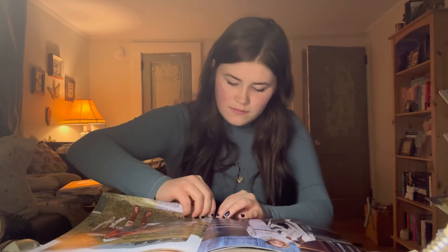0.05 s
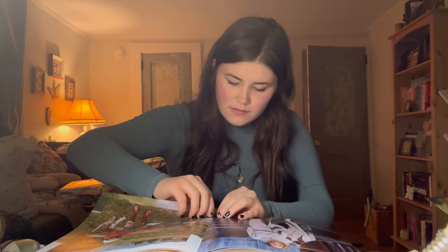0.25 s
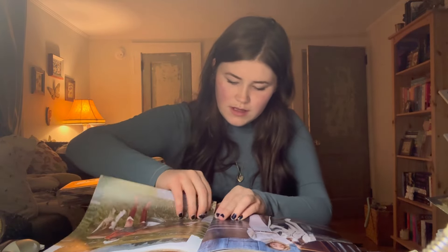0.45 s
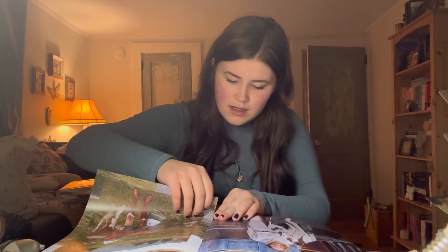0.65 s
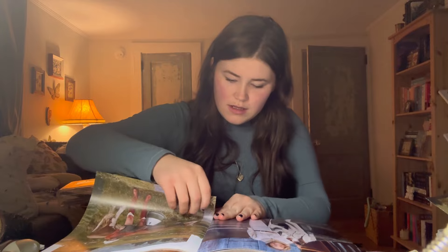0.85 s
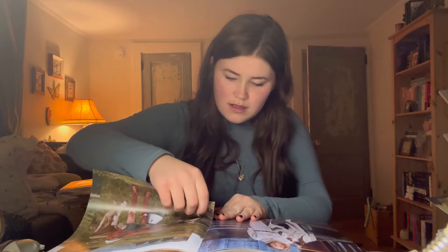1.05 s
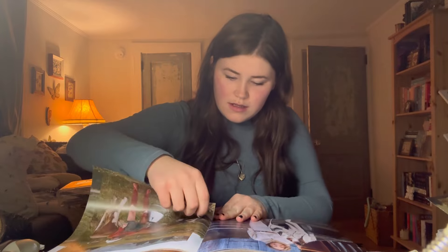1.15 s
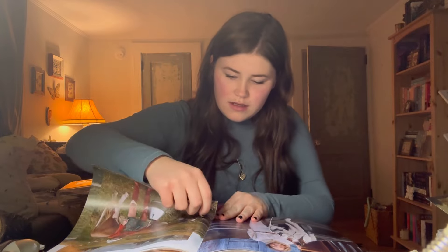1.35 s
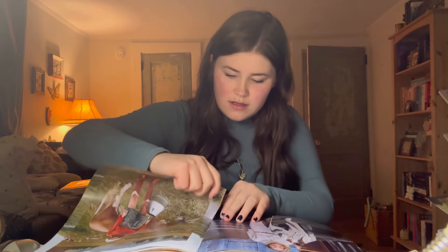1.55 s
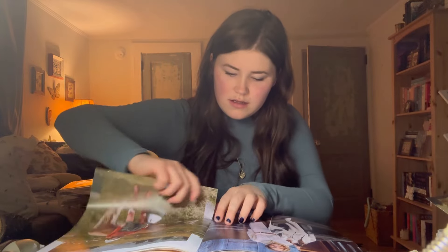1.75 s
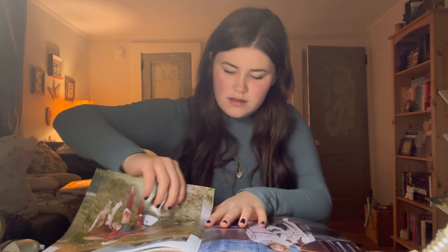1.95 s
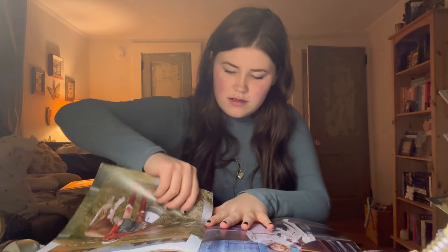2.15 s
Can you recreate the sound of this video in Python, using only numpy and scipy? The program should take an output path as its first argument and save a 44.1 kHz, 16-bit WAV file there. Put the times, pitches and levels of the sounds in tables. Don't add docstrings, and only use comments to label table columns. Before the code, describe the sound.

A glossy magazine page is ripped out by hand, close to a stereo microphone in a small furnished room: a few small snaps, a dense bright rip, then softer rustles and crinkles of the loose sheet.

```python
import sys
import numpy as np
from scipy import signal
from scipy.fft import rfft, irfft, next_fast_len
from scipy.io import wavfile
from scipy.ndimage import uniform_filter1d, minimum_filter1d, map_coordinates

SR = 44100
rng = np.random.default_rng(int(sys.argv[2]) if len(sys.argv) > 2 else 0)


def ratio_of_db(decibels):
    return 10 ** (np.asarray(decibels, float) / 20)


def master(y):
    cut = np.clip(np.atleast_2d(y).T, -1, 1)
    pcm = np.round(cut * 32767)
    wavfile.write(sys.argv[1], SR, pcm.astype(np.int16))


N = 97020


def unit(x):
    return x / np.sqrt(np.mean(x ** 2) + 1e-20)


def along(points, hz):
    f, value = np.transpose(points)
    return np.interp(np.log(hz + 1), np.log(f + 1), value)


def curve(rows, column=1):
    rows = np.transpose(rows)
    return np.interp(np.arange(N) / SR, rows[0], rows[column], right=-120)


def wobble(rate):
    knots = rng.standard_normal(2000)
    return map_coordinates(knots, [np.arange(N) * min(rate, 800) / SR])


def filtered(x, response):
    m = next_fast_len(N + 8192)
    hz = np.fft.rfftfreq(m, 1 / SR)
    return irfft(rfft(x, m) * response(hz), m)[..., :N]


def causal(spectrum):
    def response(hz):
        gain = np.maximum(ratio_of_db(along(spectrum, hz)), 1e-4)
        cepstrum = irfft(np.log(gain))
        half = len(cepstrum) // 2
        cepstrum[1:half] *= 2
        cepstrum[half + 1:] = 0
        return np.exp(rfft(cepstrum))
    return response


def place(s, shapes):
    at = np.round(s * SR).astype(int)[:, None] + np.arange(shapes.shape[1])
    return np.bincount(at.ravel(), shapes.ravel(), N + SR)[:N]


def grains(s, hz, cycles, size, glide=0, rise=0.17, length=700):
    turns = hz[:, None] * np.arange(length) / SR
    phase = turns + glide * (1 - np.exp(-turns))
    envelope = np.exp(-turns / cycles) * (1 - np.exp(-turns / rise))
    return place(s, size[:, None] * np.sin(2 * np.pi * phase) * envelope)


def crackle(spectrum, spiky_db, clump_db, clump_rate, centre, spread, cycles, ring_db, hiss_db, count):
    u, g = rng.random((count, 3)), rng.standard_normal((count, 2))
    s = u[:, 0] * (N - 1) / SR
    density = wobble(clump_rate) + 0.58 * wobble(clump_rate / 4)
    clump = ratio_of_db(clump_db * np.clip(density, -3, 1.5))
    spike_db = np.minimum(-spiky_db * np.log(u[:, 1]), 14)
    size = ratio_of_db(spike_db) * clump[(s * SR).astype(int)]
    clicks = place(s + 0.00018, (size * g[:, 1])[:, None])
    bare = clicks + ratio_of_db(hiss_db) * clump * rng.standard_normal(N)
    hz = np.interp(s, *np.transpose(centre)) * np.exp(spread * g[:, 0])
    ring = grains(s[::4], np.clip(hz[::4], 150, 9000), cycles, size[::4])
    return unit(unit(filtered(bare, causal(spectrum))) + ratio_of_db(ring_db) * unit(ring))


def snaps(rows, ring_db, crack_db, burst_s, cycles, count, lag_s=.0006):
    s, db, hz, rel_db = np.transpose(rows)
    u, g = rng.random((len(s), count)), rng.standard_normal((len(s), count))
    s = s + lag_s
    late = -burst_s * np.log(u) * (np.arange(count) > 0)
    follower = late > 0
    size = ratio_of_db(db[:, None] + ring_db - 4 * late / burst_s - 8.5 * follower) * np.sign(g)
    patch_hz = hz[:, None] * np.exp((0.2 + 0.28 * g) * follower)
    start = s[:, None] + late
    ring = grains(start.ravel(), patch_hz.ravel(), cycles, size.ravel(), glide=0.043, rise=0.37)

    t = np.arange(1300) / SR
    decay = np.exp(-t / 0.0017) + 0.22 * np.exp(-t / 0.016)
    shape = decay * (1 - np.exp(-t / 0.00029))
    noise = rng.standard_normal((len(s), len(t)))
    rough = uniform_filter1d(rng.standard_normal((len(s), len(t))), size=40) * np.sqrt(40)
    ragged = noise * ratio_of_db(3.6 * rough)
    crack = place(s, ratio_of_db(db + rel_db + crack_db)[:, None] * shape * ragged)
    return ring + filtered(crack, causal([(300, -1), (2000, 1.5), (8000, 0), (16000, -11.5)]))


# [f/Hz, level/dB]
AIR_SPECTRUM = [(25, -5), (45, 10.5), (200, -12), (600, -25.5), (4000, -40), (13000, -55), (16000, -52)]


def air():
    a, b = rng.standard_normal((2, N)) * ratio_of_db(0.94 * wobble(8.6))
    width = [(100, -9.0), (3000, 11.0), (7000, 19)]  # f/Hz, side over mid/dB
    mid = filtered(a, lambda hz: ratio_of_db(along(AIR_SPECTRUM, hz)))
    side = filtered(b, lambda hz: ratio_of_db(along(AIR_SPECTRUM, hz) + along(width, hz)))
    return ratio_of_db(-54) * np.array([mid + side, mid - side]) / np.std(mid)


def tails(x, t60s, gain_db):
    hz, t, z = signal.stft(rng.standard_normal((2, SR // 2)), SR, nperseg=128)
    width = (2.2 * hz / (hz + 700) / (1 + hz / 9000))[:, None]
    z = z * [[[1]], [[0]]] + z * [[[0]], [[1]]] * width
    decay = ratio_of_db(-60 * t / along(t60s, hz)[:, None])
    mid, side = signal.istft(z * decay, SR, nperseg=128)[1]
    tail = np.array([mid + side, mid - side])
    return ratio_of_db(gain_db) * signal.fftconvolve(x[None], tail / np.linalg.norm(tail[0]), axes=1)[:, :N]


# [t/s, level/dB]
RUSTLE_LEVEL = [(0, -40.5), (.05, -65), (.1, -65), (.19, -50.5), (.26, -44), (.31, -52), (.6, -48),
                (1.1, -39.5), (1.24, -48.5), (1.31, -56), (1.4, -45.5), (1.47, -46), (1.51, -37),
                (1.56, -47.5), (1.72, -43), (1.81, -31), (1.87, -40.5), (2.2, -46.5)]
# [f/Hz, level/dB per Hz]
SHEET_SPECTRUM = [(53, -30), (90, -3.5), (737, -7), (935, -0.5), (1320, -9.5), (2000, -5.5), (7820, -18),
                  (9510, -25.5), (16000, -18)]
# [t/s, peak level/dB, f/Hz, sag/turns]
AIR_FLAPS = [(0.2039, -24.5, 337, 2.4), (0.49, -36, 243, 0.69), (0.582, -21.5, 252, 0.63),
             (0.622, -20, 313, 1.17), (0.651, -20.5, 323, 1.54), (1.515, -39, 210, 0.18),
             (1.591, -36.5, 99, 0.37), (1.822, -27, 368, 0.57), (1.873, -35.5, 105, 0.42),
             (1.897, -28, 282, 0.57), (2.105, -30.5, 245, 0.91), (2.15, -34, 176, 1.34)]
# [t/s, peak level/dB, ring f/Hz, crack level over ring/dB]
SHEET_CREASES = [(1.2, -43, 1050, -4), (1.224, -35, 990, -19), (1.2605, -31.5, 1350, -26),
                 (1.496, -22, 2000, -20), (1.505, -25.5, 1740, -5), (1.512, -27, 1120, -3.5),
                 (1.71, -24.5, 930, -42), (1.728, -35, 1220, -21.5), (1.759, -20, 2010, -35),
                 (1.777, -23, 910, -30), (1.796, -26, 1920, -29), (1.808, -27, 594, -30),
                 (1.821, -25, 945, -35), (1.835, -26, 1480, -15), (1.9285, -25, 530, -23),
                 (1.963, -41, 1910, -30), (1.967, -26, 600, -17), (1.968, -25, 1610, -31),
                 (2.082, -22, 1520, -33), (2.084, -28, 690, -31), (2.177, -25.5, 950, -16),
                 (2.195, -22, 2880, -7.5)]


def sheet():
    rustle = crackle(SHEET_SPECTRUM, spiky_db=3.2, clump_db=2.2, clump_rate=110, centre=[(0, 800)],
                     spread=0.72, cycles=1.6, ring_db=-2, hiss_db=-10, count=7000)
    s, db, hz, sag = np.transpose(AIR_FLAPS)
    rise = 0.14 / (1 + sag[:, None]) ** 2
    flaps = grains(s, hz, 2.06, ratio_of_db(db + 1), glide=sag[:, None], rise=rise, length=5100)
    push = grains(s + 0.0014, 0.55 * hz, 0.95, ratio_of_db(db - 5), length=2600)
    creases = snaps(SHEET_CREASES, ring_db=3.5, crack_db=-1.5, burst_s=0.0028, cycles=1.0, count=9)
    return ratio_of_db(curve(RUSTLE_LEVEL)) * rustle + flaps + push + creases


# [t/s, level/dB, brightness/dB]
RIP_COURSE = [(0, -61, 28.5), (.06, -80, 27.5), (.34, -74, -7), (.352, -37.5, 5), (.41, -73, 7),
              (.485, -83, -5), (.51, -25, -19), (.54, -73, -16), (.61, -43, 2), (.63, -36.5, 8),
              (.75, -29, -2), (.995, -39.5, 10.5), (1.02, -39, 8.5), (1.12, -55, 22.5), (1.24, -73, 36),
              (1.33, -89, -11), (1.385, -53, 12.5), (1.48, -64, 1)]
# [f/Hz, level/dB per Hz]
FIBRE_SPECTRUM = [(120, -39), (200, -39), (289, -2.5), (465, -10.5), (2050, -21.5), (5940, -13),
                  (7970, -14), (9400, -15), (16000, -15)]
# [t/s, f/Hz]
FLAP_RING = [(.6, 2780), (1.05, 1630)]
# [t/s, peak level/dB, ring f/Hz, crack level over ring/dB]
FIBRE_TICKS = [(0.6213, -2.5, 2670, -20), (0.6275, -15, 2640, -16), (0.6342, -17, 2660, 3),
               (0.6376, -17, 2930, -8), (0.6429, -8, 2940, -15), (0.6505, -8, 3920, -7.5),
               (0.66, -12.5, 2800, -17), (0.6708, -14.5, 2870, -6), (0.6863, -18, 2570, -13.5),
               (0.6936, -9, 2620, -6), (0.703, -20, 2400, -13), (0.7094, -22, 2280, -6),
               (0.718, -8, 2340, -27), (0.7232, -10.5, 1830, -30), (0.7306, -13, 2600, -15),
               (0.7345, -12, 2630, -16), (0.7401, -15.5, 1460, -26), (0.745, -10.5, 1520, -5),
               (0.753, -9.5, 2080, -20.5), (0.7648, -15, 2460, -29), (0.7695, -14, 2840, -8.5),
               (0.7779, -28, 1740, -6), (0.7846, -17, 1230, -21), (0.7916, -24, 2690, 2),
               (0.7983, -19.5, 1920, -6), (0.8067, -19, 1630, -1.5), (0.8156, -35, 2430, -6),
               (0.8206, -15, 1730, -16), (0.8254, -9.5, 1780, -19), (0.8291, -14, 1680, -17),
               (0.834, -27, 1760, -25), (0.8442, -20, 1720, -4), (0.8621, -19, 1690, -15),
               (0.8711, -10, 1800, -10), (0.8762, -28, 1560, -21), (0.9119, -14, 1850, -5),
               (0.9153, -24, 1300, -18), (0.9208, -15, 1810, -10), (0.9395, -16, 1420, -6),
               (0.9445, -19, 1520, -12), (0.9567, -19, 1870, -15), (0.9655, -17.5, 1840, -11),
               (0.9756, -30, 1650, -17), (0.9809, -32, 1940, -24), (1.0098, -11, 1600, -26),
               (1.0213, -8, 1810, -17), (1.0328, -28, 1710, -29), (1.0407, -19, 1880, -26),
               (1.0667, -18.5, 1560, -16), (1.1009, -44, 1770, -22)]
# [t/s, peak level/dB, ring f/Hz, crack level over ring/dB]
GLUE_SNAPS = [(0.2041, -30, 1260, -2.5), (0.314, -32, 1940, 3.5), (0.351, -24, 4430, -6.5),
              (0.357, -14, 2570, -17), (0.4195, -33, 3000, 1), (0.424, -28, 2160, -1.5),
              (0.447, -24, 2420, -20), (0.487, -25.5, 5000, 0), (0.4905, -16, 1950, -9.5),
              (0.5, -7, 4990, -18), (0.516, -18.5, 1950, -6.5), (0.554, -20, 2060, -6),
              (0.558, -20, 1950, -9.5), (0.5795, -14.5, 3060, -2.5), (0.619, -7.5, 4940, -15.5),
              (0.637, -11, 4600, -6.5), (0.647, -19.5, 5570, -0.5), (0.91, -24.5, 1650, 1.5)]


def tear():
    rip = crackle(FIBRE_SPECTRUM, spiky_db=3.5, clump_db=3.8, clump_rate=230, centre=FLAP_RING,
                  spread=.37, cycles=2, ring_db=2.5, hiss_db=-12, count=8000)
    fine = filtered(rip, lambda hz: hz ** 2 / (hz ** 2 + 5000 ** 2))
    rip = rip + (ratio_of_db(curve(RIP_COURSE, column=2)) - 1) * fine
    ticks = snaps(FIBRE_TICKS, ring_db=6.5, crack_db=-0.5, burst_s=0.0025, cycles=0.82, count=4, lag_s=.00005)
    glue = snaps(GLUE_SNAPS, ring_db=-3.0, crack_db=3.0, burst_s=0.0014, cycles=2.7, count=9)
    return ratio_of_db(curve(RIP_COURSE)) * rip + ticks + glue


# [f/Hz, level/dB]
PORT_SWAY = [(900, -30), (2400, -6), (6000, -3), (9000, -12), (16000, -16)]
# [f/Hz, t60/s]
ROOM_T60 = [(200, 0.12), (2000, 0.24), (10000, 0.23)]
# [f/Hz, left over right/dB]
PORT_TILT = [(60, -1), (300, 0), (700, 2), (1300, 2), (2400, 6.5), (4400, 1), (15000, 0)]
# [f/Hz, left lead/rad]
PORT_LEAD = [(0, 0), (2100, .4), (2750, -.9), (5200, -1.2), (6000, -3), (6700, -2.3), (7300, -.2),
             (9600, 3.1), (11300, 6), (12800, 6.5), (14000, 9.2), (16000, 10.2)]


def scene():
    page = tear() + sheet()

    def ports(hz):
        left = ratio_of_db(along(PORT_TILT, hz) / 2) * np.exp(.5j * np.interp(hz, *np.transpose(PORT_LEAD)))
        return left ** np.array([[1], [-1]])

    table = tails(np.pad(page, (60, 0))[:N], [(200, 0.051), (8000, 0.015)], -9)
    shaded = filtered(page, lambda hz: ratio_of_db(along(PORT_SWAY, hz)))
    sway = shaded * wobble(90) * np.array([[1], [-1]])
    walls = tails(np.pad(page, (250, 0))[:N], ROOM_T60, -11)
    return filtered(page + sway + table + walls + air(), ports)


# [low f/Hz, high f/Hz, threshold level/dB]
TREBLE_BANDS = [(7300, 8200, -8), (8900, 10300, -1.3), (11000, 13100, -2), (13800, 15300, -1.5),
                (15300, 16000, -5)]
# [treble level/dB, crest/dB]
BUSY_CREST = [(-58, 12), (-52, 10.5), (-47, 5.5), (-42, 4.3)]


def joint(x):
    both = np.array([x[0] + x[1], x[0] - x[1]]) / 2
    hz, t, z = signal.stft(both, SR, nperseg=1024, noverlap=768)
    fast = uniform_filter1d(np.diff(x[0], prepend=0) ** 2, size=128)
    slow = np.abs(uniform_filter1d(fast, size=2048)) + 1e-14
    peak = -minimum_filter1d(-fast, size=1400)
    limit_db = np.interp(10 * np.log10(slow), *np.transpose(BUSY_CREST))
    calm = peak / slow < ratio_of_db(2 * limit_db)
    frame_centre = (t * SR).astype(int) // 1024 * 1024 + 512
    calm = calm[np.minimum(frame_centre, N - 1)]
    for lo, hi, weak_db in TREBLE_BANDS:
        band = (hz >= lo) & (hz < hi)
        power = uniform_filter1d(np.mean(np.abs(z[:, band]) ** 2, axis=1), size=5)
        faint = power < ratio_of_db(2 * weak_db) * power[::-1]
        z[:, band] *= ~(faint & calm)[:, None]
    mid, side = signal.istft(z, SR, nperseg=1024, noverlap=768)[1][:, :N]
    return np.array([mid + side, mid - side])


def band_limit(x):
    return signal.sosfilt(signal.butter(12, 16660, fs=SR, output="sos"), x)


def record(dry):
    x = joint(filtered(dry, lambda hz: (hz < 16000) * hz ** 5 / (hz ** 5 + 34 ** 5)))
    x = x / (1 + np.abs(x / .7) ** 4) ** (1 / 4)
    return band_limit(x)


dry = scene()
out = record(dry)
master(out)
```